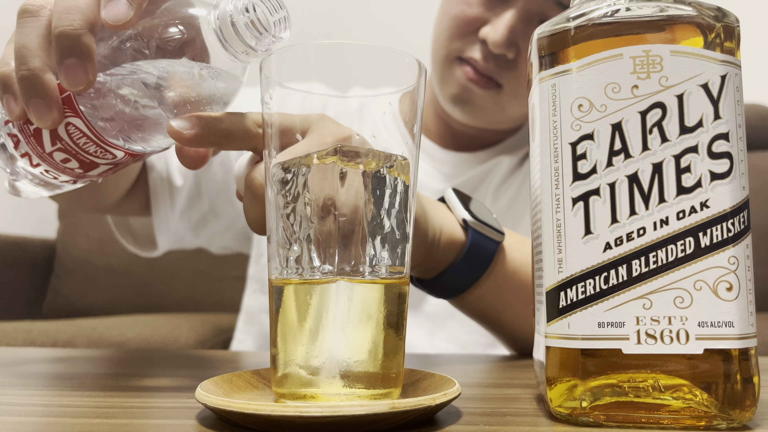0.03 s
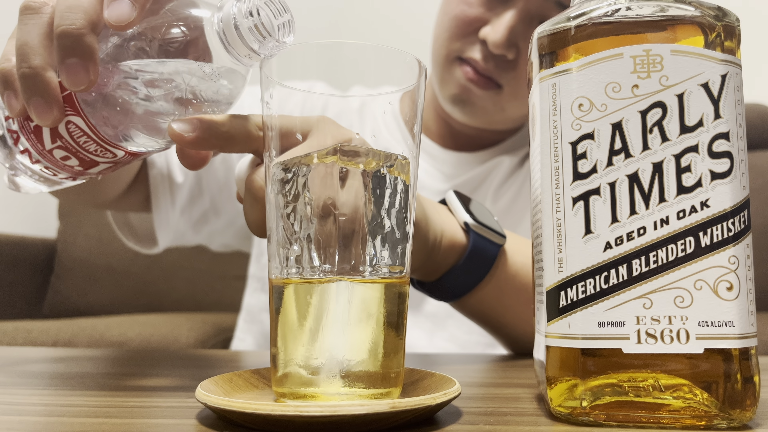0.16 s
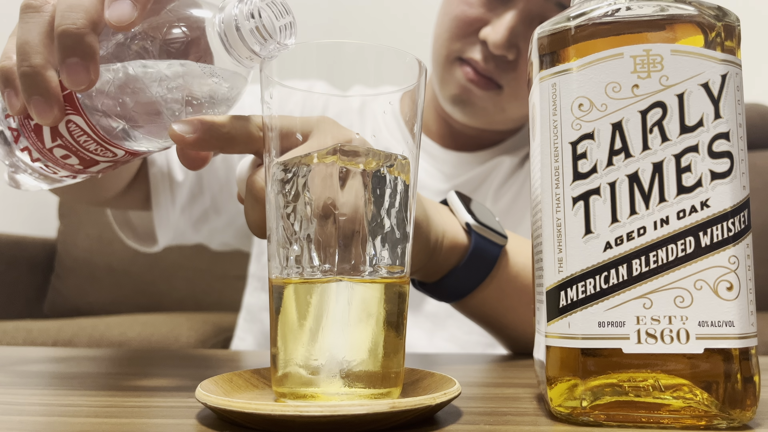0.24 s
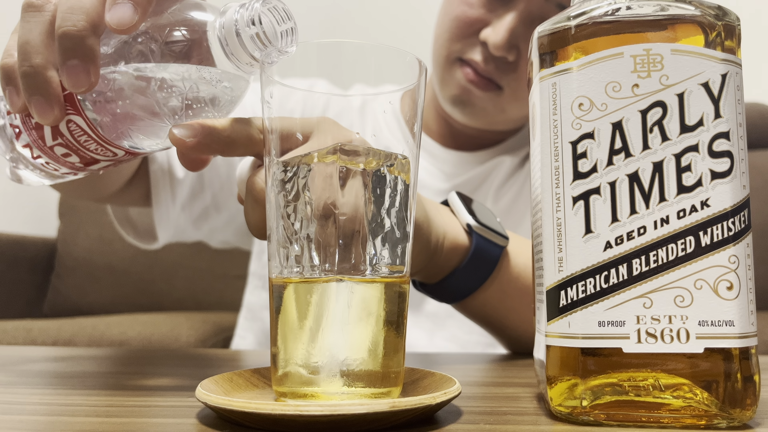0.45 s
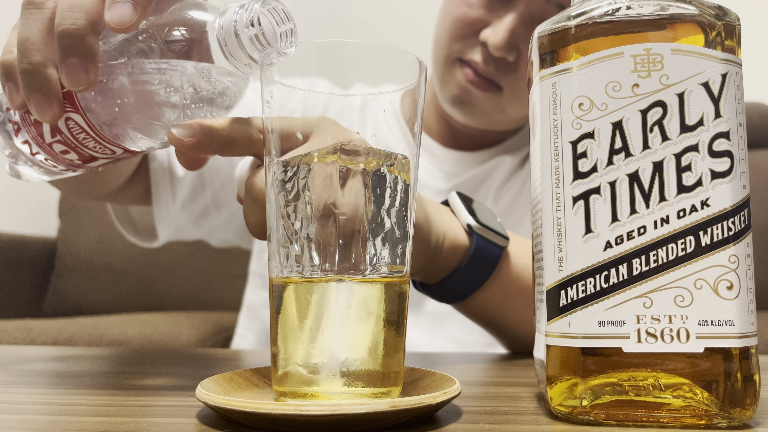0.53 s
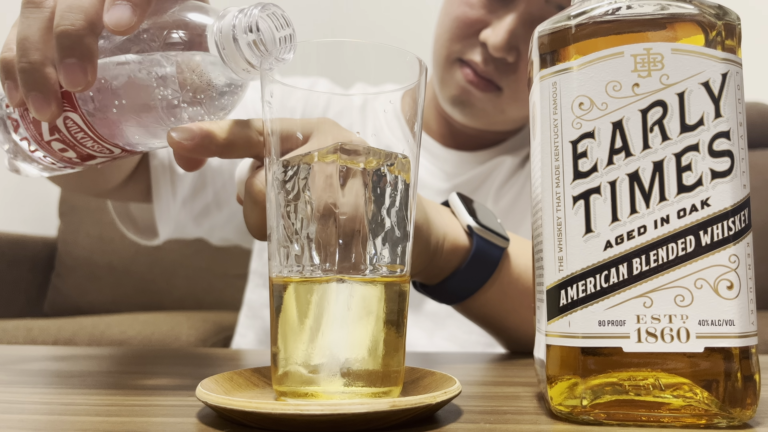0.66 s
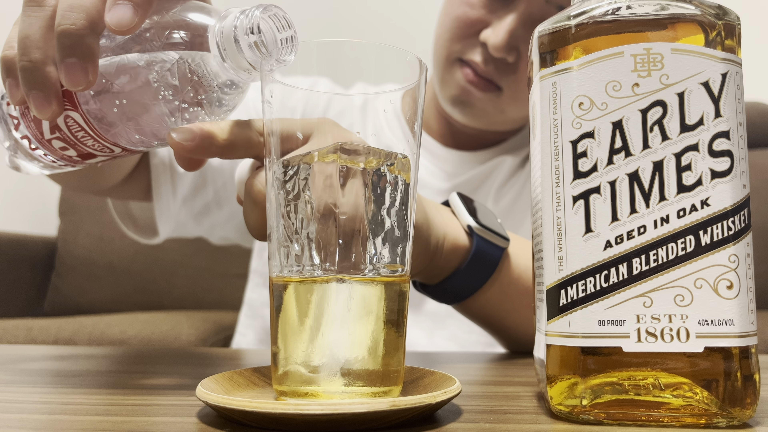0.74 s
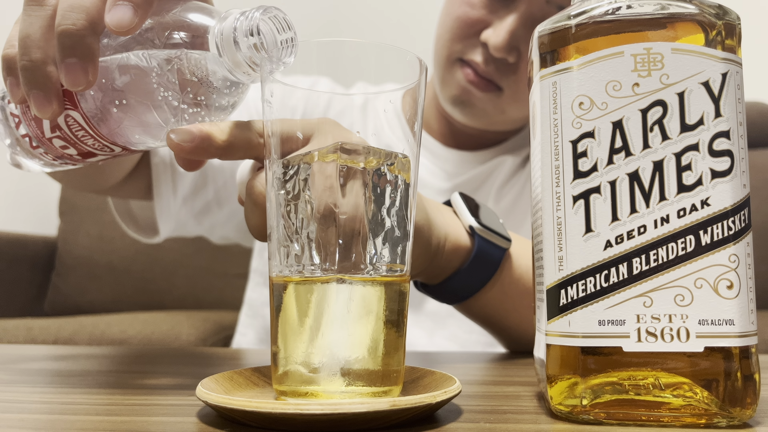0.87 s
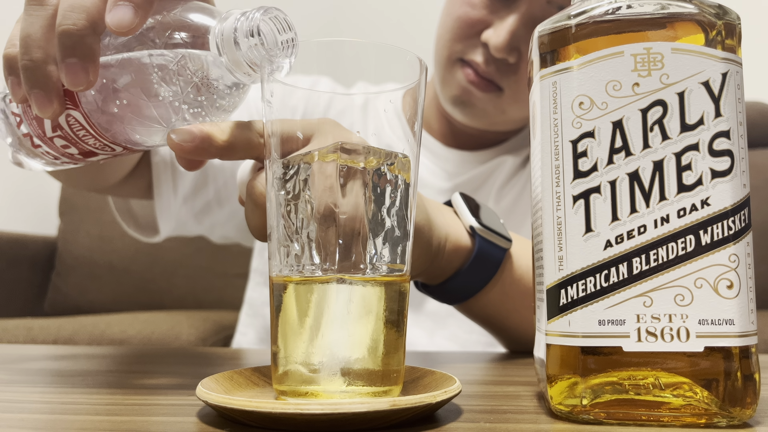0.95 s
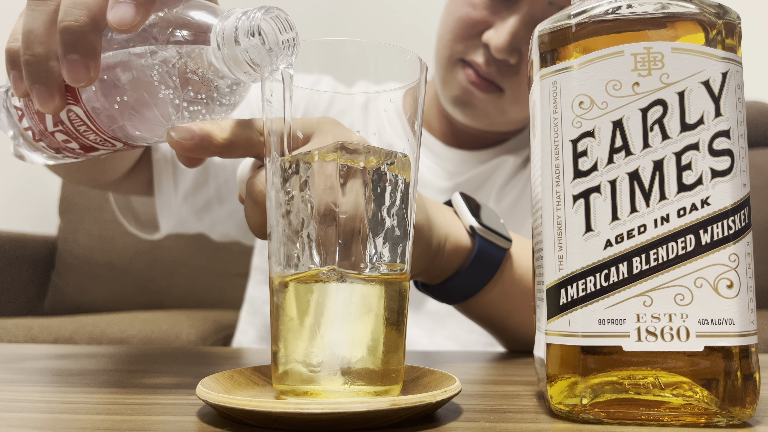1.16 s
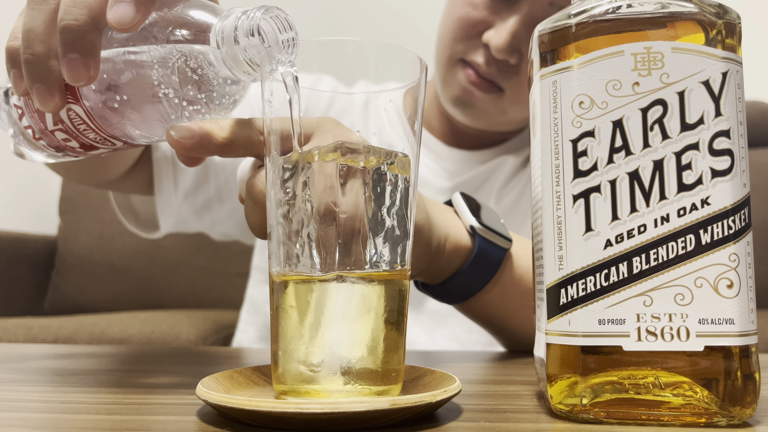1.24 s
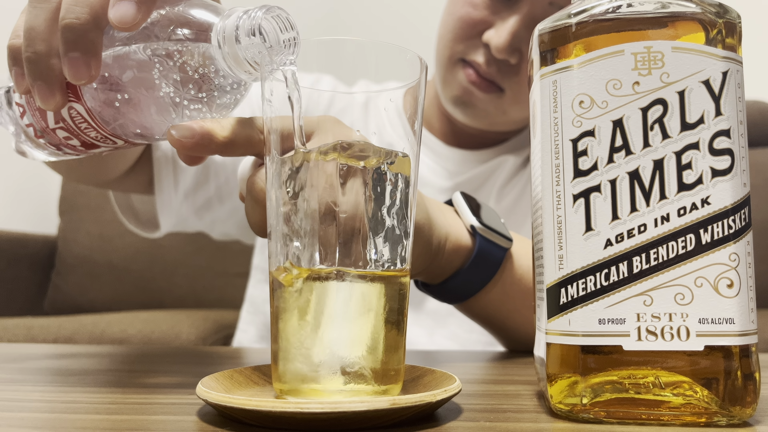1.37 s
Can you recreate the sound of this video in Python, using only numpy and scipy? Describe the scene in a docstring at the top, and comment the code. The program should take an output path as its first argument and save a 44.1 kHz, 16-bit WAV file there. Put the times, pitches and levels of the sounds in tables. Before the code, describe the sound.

A hard crack of ice in a glass, close and to the left, knocks lightly through the table. Two low glugs from a pouring plastic bottle and a few thin ice ticks follow, over faint indoor rumble and hiss.

```python
"""Ice cracks once, hard, in a tall glass on a wooden table as soda is poured gently over it.
Small room, stereo microphone close by, the glass left of centre. Splinters lead into the snap,
and the jolt runs through the table, treble first, bass last. The soda starts with a faint fizz,
the plastic bottle gulps twice as air enters it, and tiny fractures in the ice give thin ticks.
Behind it all lies the room tone: low rumble and hiss."""
import sys
import numpy as np
from scipy import signal
from scipy.fft import rfft, irfft, next_fast_len
from scipy.io import wavfile

SR = 44100
rng = np.random.default_rng(int(sys.argv[2]) if len(sys.argv) > 2 else 0)


def store_wav(level_fs):
    """Save 16-bit WAV to argv[1]."""
    pcm = np.round(np.clip(np.atleast_2d(level_fs), -1, 1) * 32767)
    wavfile.write(sys.argv[1], SR, pcm.T.astype(np.int16))


N = 61739
FFT_SIZE = next_fast_len(2 * N)
HZ, T = np.fft.rfftfreq(FFT_SIZE, 1 / SR), np.arange(N) / SR

# splinters around the snap (time [s], relative level [dB])
SPLINTER_RUN = [(0.1992, -10), (.2000, -5), (.2012, -14), (0.2018, -6.5), (.2033, -11), (.2045, -12),
                (0.2036, -8.5), (0.2072, -2.5), (0.2072, 0.5), (.2100, -30), (0.2127, -10.5)]
# spectra of the splinters, the snap and the table's jolt (frequency [Hz], relative level [dB])
SPLINTER_SPECTRUM = [(200, -1), (700, 2.5), (1900, 3.5), (3000, -2), (5500, -8), (8500, -14),
                     (10500, -25.5), (12500, -29), (16000, -45)]
SNAP_SPECTRUM = [(300, -24), (560, -14), (700, -12), (800, -16), (900, -1), (1350, -1), (1620, -7),
                 (1850, -4), (2100, -5), (2400, -15), (2600, -14), (3000, -28), (3900, -22), (5000, -28),
                 (8000, -30), (11000, -50), (16000, -70)]
JOLT_SPECTRUM = [(20, -50), (45, -16), (68, 2), (92, -5.5), (150, 3), (310, 2), (420, -0.5), (560, -11),
                 (800, -11.5), (1500, -44), (4000, -63), (12000, -110)]
# the crack's direct sound at the microphone (frequency [Hz], left minus right [dB])
CRACK_PAN = [(70, -25), (150, 8.5), (350, 2), (600, 7), (1000, 13), (1400, 29), (2000, 17.5), (4000, 26),
             (8000, 24), (12000, 2)]
# gulps of the bottle (time [s], thump gain [dB], wall ring gain [dB], click gain [dB])
BOTTLE_GULPS = [(0.9435, 21.5, -34, -43.5), (1.1325, 18, -44.5, -53.5)]
# spectra of a gulp's thump and of the wall's click (frequency [Hz], relative level [dB])
THUMP_SPECTRUM = [(40, -58), (100, -13.5), (160, -2), (240, -1), (330, -9.5), (420, -15), (600, -29),
                  (900, -36), (3000, -80), (8000, -115)]
CLICK_SPECTRUM = [(300, 10), (600, 1), (1800, 0), (2600, -12), (3300, 3), (4100, -10), (5000, -18),
                  (7000, -12), (9000, -28.5), (15000, -25)]
# modes of the plastic wall (frequency [Hz], relative level [dB], t60 [s])
BOTTLE_MODES = [(1002, 4, 0.064), (1140, -16, 0.055), (1290, -18, .05), (1655, -14, 0.046),
                (1898, -7, 0.078), (2910, -25.5, 0.11), (3316, -40, .07), (5630, -35, .06)]
# ticks of the ice (time [s], level [dB], pitch [Hz], half-width [share of pitch],
# relative sizzle level [dB], left minus right [dB])
ICE_TICKS = [(0.055, -60, 4370, 0.24, -60, 9), (.8810, -57.5, 12100, 0.11, -3, 1),
             (1.1635, -45, 9600, 0.19, -8, -3), (1.1965, -46, 6770, 0.13, -45, 4.5),
             (1.3202, -41, 10380, 0.12, -42, 0)]
# reflections off nearby walls (delay [s], gain [ratio])
WALL_ECHOES = [(0.0128, 0.13), (0.0177, 0.43)]
# standing waves of the room (frequency [Hz], relative level [dB], t60 [s])
ROOM_MODES = [(159, -48, 0.55), (231, -43.5, 0.52), (282.2, -38.5, 0.414), (329.4, -55, 0.29),
              (373, -51.5, 0.48), (449, -54, 0.17), (547, -58, .12)]
# reverberation of the room (frequency [Hz], t60 [s])
ROOM_T60 = [(100, 0.51), (300, 0.25), (1000, 0.15), (4000, 0.26), (10000, 0.21), (16000, 0.13)]
# spectra of the room tone (frequency [Hz], relative level [dB])
RUMBLE_SPECTRUM = [(12, -40), (20, -20), (37, -7.5), (59, 0.5), (97, -4.5), (165, -2), (184, -14),
                   (219, -6), (309, -17), (386, -13.5), (428, -22.5), (700, -38.5), (910, -40),
                   (1540, -120)]
HISS_SPECTRUM = [(300, -14.5), (500, -4.5), (680, -9), (850, -3), (1050, -9.5), (1300, -12.5), (1620, -1.5),
                 (1900, -3), (2250, -9.5), (2800, -22.5), (3600, -20), (5000, -25.5), (5900, -23),
                 (7300, -32.5), (12800, -35.5), (15500, -61)]
# the hiss at the microphone (frequency [Hz], left minus right [dB])
HISS_PAN = [(600, 2.5), (1300, 6), (2400, 12), (4400, 11), (8000, 6.5), (14000, -4)]

CRACK_S, JOLT_LAG_S, SWAY_LAG_S, LEFT_LAG_S = 0.2071, 0.00025, 0.008, 0.0007
SPLINTER_DB, SNAP_DB, JOLT_DB = -23, 18.3, 23.5
TABLE_HZ, TABLE_DB, TABLE_T60 = 63, -30, 0.13  # the table's lowest mode
GULP_PAN_DB, WALL_PAN_DB, BOOM_DB = 4.5, 7, -19.5
SIZZLE_HZ, SIZZLE_WIDTH = 14800, 0.029
FIZZ_PEAK_S, FIZZ_SWELL_S, FIZZ_HZ, FIZZ_DB = 0.756, 0.041, 5730, -75.5
# sends to the room's tail
CRACK_ROOM_DB, SPLINTER_ROOM_DB = -35.5, -18.5
GULP_ROOM_DB, WALL_ROOM_DB, TICK_ROOM_DB = -7.5, -9, -5.5
RUMBLE_DB, HISS_DB, BAND_LIMIT_HZ = -45.5, -56.5, 15600


def ice_crack():
    """Close, to the left: ice splinters and snaps; the jolt crosses the table and leaves it swaying."""
    envelope = np.sqrt(sum((amp(db) * decay(s, t60=0.01)) ** 2 for s, db in SPLINTER_RUN))
    splinters = burst(amp(SPLINTER_DB) * envelope, amp(curve(SPLINTER_SPECTRUM)))
    snap = amp(SNAP_DB) * pulse(CRACK_S, SNAP_SPECTRUM, spread_s=0.00088)
    jolt = amp(JOLT_DB) * pulse(CRACK_S + JOLT_LAG_S, JOLT_SPECTRUM, spread_s=0.00688)
    sway_s = CRACK_S + SWAY_LAG_S
    sway = ringing(sway_s, [(TABLE_HZ, TABLE_DB, TABLE_T60)], attack_s=0.0031)
    table = filtered(jolt + sway, delay(LEFT_LAG_S * np.array([[.5], [-.5]])))
    direct = filtered(splinters + snap + table, pan(curve(CRACK_PAN)))
    crack_tail = amp(CRACK_ROOM_DB) * room(snap + jolt)
    splinter_tail = amp(SPLINTER_ROOM_DB) * pan(db=22) * room(splinters)
    return direct + crack_tail + splinter_tail


def bottle_gulps():
    """Air enters the bottle: a low falling thump, a click and ring of its wall, and the room's boom."""
    out = np.zeros((2, N))
    echoes = 1 + sum(gain * delay(s) for s, gain in WALL_ECHOES)
    for s, thump_db, ring_db, click_db in BOTTLE_GULPS:
        thump = amp(thump_db) * pulse(s, THUMP_SPECTRUM, spread_s=0.00603)
        boom = amp(thump_db + BOOM_DB) * ringing(s, ROOM_MODES, attack_s=0.017)
        ring = amp(ring_db) * ringing(s, BOTTLE_MODES, attack_s=0.005)
        click = burst(amp(click_db) * decay(s, t60=0.047), amp(curve(CLICK_SPECTRUM)))
        wall = ring + click
        out += pan(GULP_PAN_DB) * (filtered(thump, echoes) + boom + amp(GULP_ROOM_DB) * room(thump))
        out += pan(WALL_PAN_DB) * (wall + amp(WALL_ROOM_DB) * room(wall))
    return out


def ice_ticks():
    """Tiny fractures in the glass's ice: short bursts in one broad resonance, with a sizzle on top."""
    out = np.zeros((2, N))
    for s, db, hz, width, sizzle_db, pan_db in ICE_TICKS:
        colour = resonance(hz, width) + amp(sizzle_db) * resonance(SIZZLE_HZ, SIZZLE_WIDTH)
        tick = np.array([burst(amp(db) * decay(s, t60=0.042), colour) for side in range(2)])
        out += pan(pan_db) * (tick + amp(TICK_ROOM_DB) * room(tick[0]))
    return out


def soda_fizz():
    """Left of the microphone, a faint narrow hiss swells and fades as the soda starts to run."""
    swell = np.exp(-((T - FIZZ_PEAK_S) / FIZZ_SWELL_S) ** 2)
    return pan(db=13) * amp(FIZZ_DB) * swell * noise(resonance(FIZZ_HZ, width=0.013))


def room(x):
    """The small room's diffuse tail: each frequency dies at its own speed; the bass is near mono."""
    hz, t, spectra = signal.stft(rng.standard_normal((2, SR // 2)), SR, nperseg=256)
    fade = amp(-60 * t / curve(ROOM_T60, hz)[:, None])
    tail = signal.istft(spectra * fade, SR, nperseg=256)[1]
    tail *= np.minimum(np.arange(tail.shape[1]) / SR / 0.0084, 1)  # builds up over 8.4 ms
    wet = signal.fftconvolve(x[None], tail / np.linalg.norm(tail[0]), axes=1)[:, :N]
    mono_share = 1 / (1 + (HZ / 700) ** 2)
    wide = np.array([wet[1], (wet[0] - wet[1]) * np.sqrt(.5)])
    return filtered(wet[0], np.sqrt(mono_share)) + filtered(wide, np.sqrt(1 - mono_share))


def room_tone():
    """All round the microphone: low rumble, nearly mono, and a wide hiss that leans left."""
    rumble = amp(RUMBLE_DB) * pan(db=2.5) * stereo_noise(RUMBLE_SPECTRUM, correlation=0.76)
    hiss = amp(HISS_DB) * stereo_noise(HISS_SPECTRUM, correlation=0.02)
    return rumble + filtered(hiss, pan(curve(HISS_PAN)))


def pulse(s, spectrum, spread_s):
    """One push; as in a bending wave, low frequencies arrive later (by spread_s at 100 Hz)."""
    cepstrum = irfft(np.log(amp(curve(spectrum))), FFT_SIZE)
    causal_fold = 1 + np.sign(FFT_SIZE / 2 - np.arange(FFT_SIZE))
    causal_fold[0] = 1
    minimum_phase = np.exp(rfft(cepstrum * causal_fold))
    dispersion = np.exp(-4j * np.pi * spread_s * np.sqrt(100 * HZ))
    return irfft(minimum_phase * dispersion * delay(s), FFT_SIZE)[:N]


def ringing(s, modes, attack_s):
    """Damped sines with a soft start at time s."""
    rise = 1 - np.exp(-np.maximum(T - s, 0) / attack_s)
    return rise * sum(amp(db) * decay(s, t60) * np.sin(2 * np.pi * hz * (T - s)) for hz, db, t60 in modes)


def burst(envelope, colour):
    """A white-noise burst that rings through a body of the given colour."""
    return filtered(envelope * rng.standard_normal(N), unit_rms(colour))


def stereo_noise(spectrum, correlation):
    """Steady noise with a given correlation between left and right."""
    angle = np.arccos(correlation) / 2
    colour = amp(curve(spectrum))
    mid, side = np.cos(angle) * noise(colour), np.sin(angle) * noise(colour)
    return np.array([mid + side, mid - side])


def noise(colour):
    """Coloured noise of rms 1."""
    return unit_rms(filtered(rng.standard_normal(N), colour))


def resonance(hz, width):
    """Gain of one resonance; width is a share of its pitch."""
    detuning = HZ / hz - hz / (HZ + 1)
    return (1 + (detuning / (2 * width)) ** 2) ** -.75


def decay(s, t60):
    """Envelope that starts at time s and falls 60 dB in t60 seconds."""
    return (T >= s) * amp(-60 * np.maximum(T - s, 0) / t60)


def pan(db):
    """Constant-power gains that put left db above right."""
    gains = amp(np.array([[.5], [-.5]]) * db)
    return gains / np.sqrt(np.mean(gains ** 2, axis=0))


def delay(s):
    """Response of a delay of s seconds."""
    return np.exp(-2j * np.pi * HZ * s)


def filtered(x, response):
    """x through a frequency response."""
    return irfft(rfft(x, FFT_SIZE) * response, FFT_SIZE)[..., :N]


def curve(points, hz=HZ):
    """(frequency, value) points joined on a log frequency axis."""
    frequencies, values = np.transpose(points)
    return np.interp(np.log(hz + 1), np.log(frequencies + 1), values)


def amp(db):
    """Decibels to gain."""
    return 10 ** (np.asarray(db) / 20)


def unit_rms(x):
    """x scaled to rms 1."""
    return x / np.sqrt(np.mean(x ** 2) + 1e-20)


def scene():
    """Everything that reaches the microphone."""
    return ice_crack() + bottle_gulps() + ice_ticks() + soda_fizz() + room_tone()


def record(dry):
    """The recorder keeps nothing above its band limit."""
    return filtered(dry, 1 / np.sqrt(1 + (HZ / BAND_LIMIT_HZ) ** 120))


dry = scene()
out = record(dry)
store_wav(out)
```